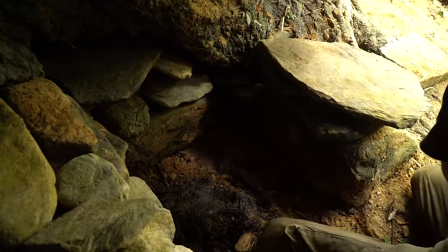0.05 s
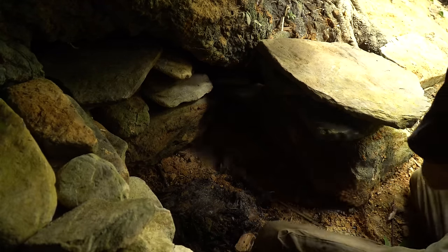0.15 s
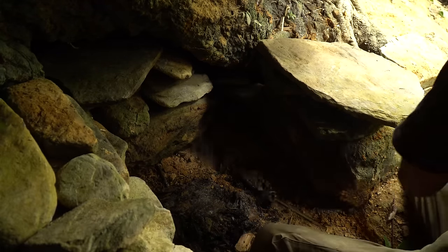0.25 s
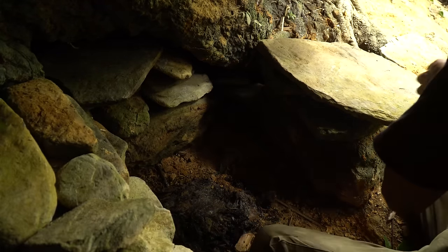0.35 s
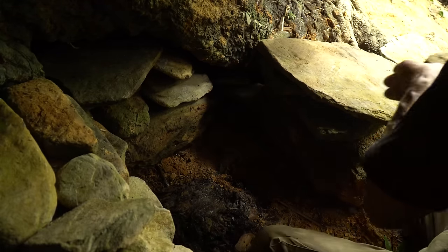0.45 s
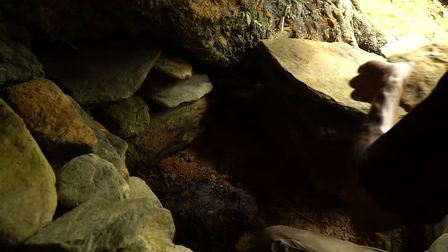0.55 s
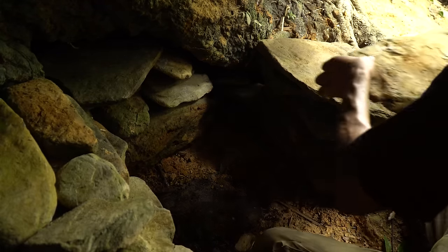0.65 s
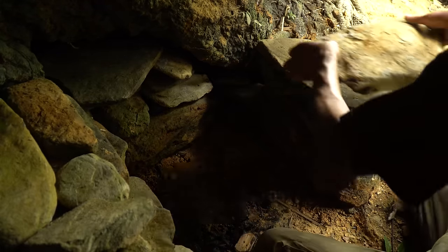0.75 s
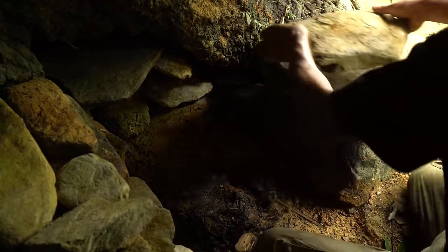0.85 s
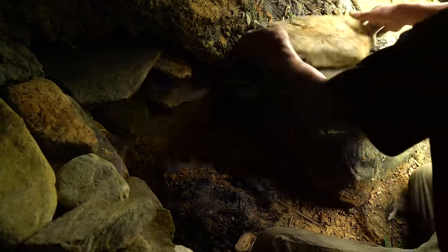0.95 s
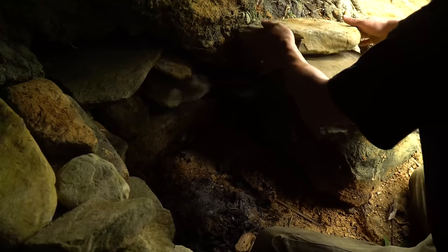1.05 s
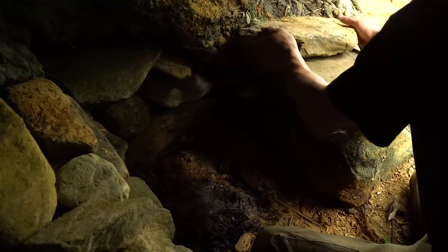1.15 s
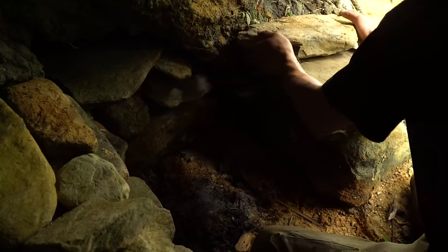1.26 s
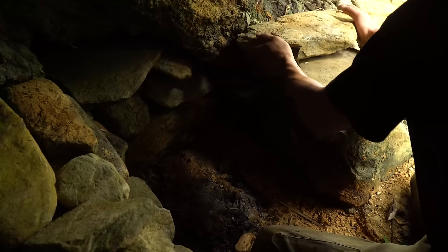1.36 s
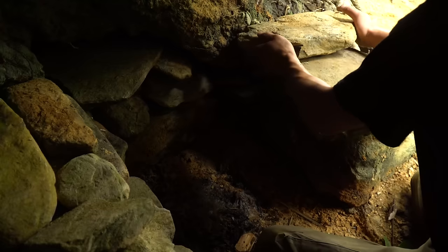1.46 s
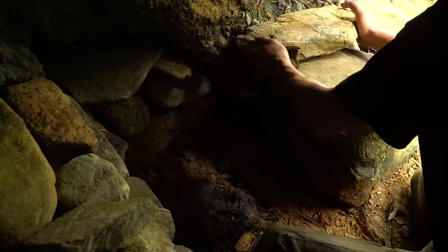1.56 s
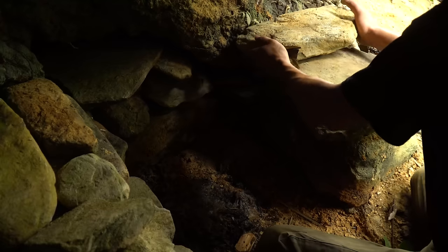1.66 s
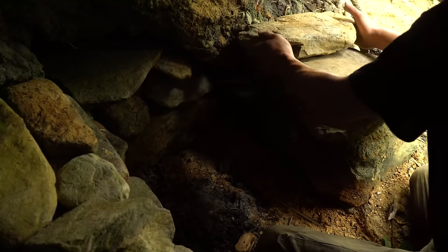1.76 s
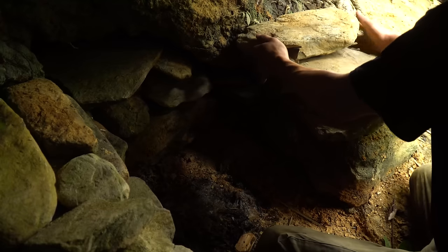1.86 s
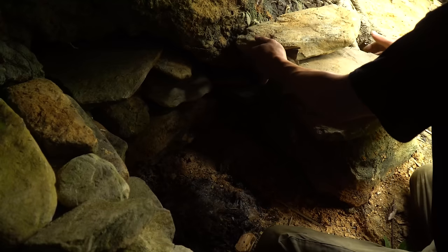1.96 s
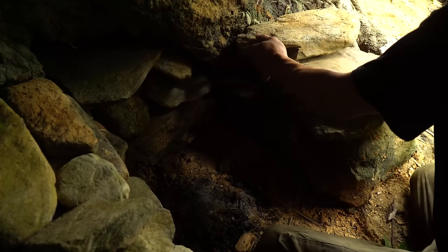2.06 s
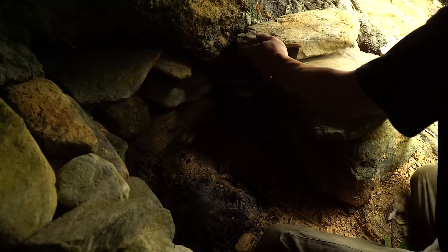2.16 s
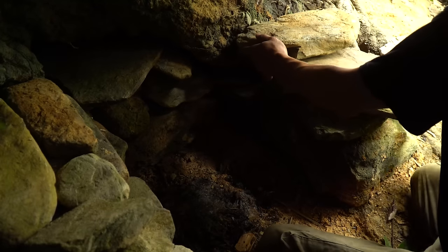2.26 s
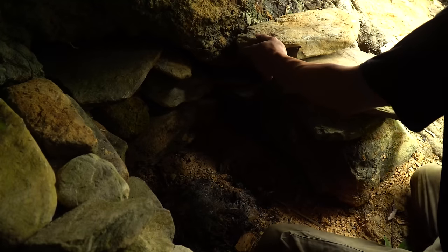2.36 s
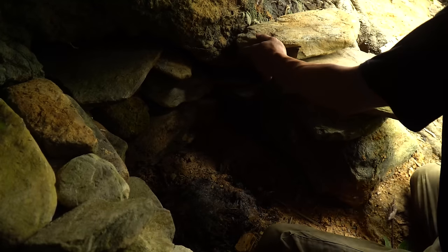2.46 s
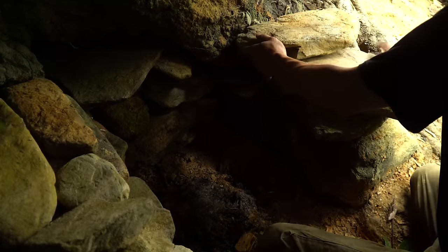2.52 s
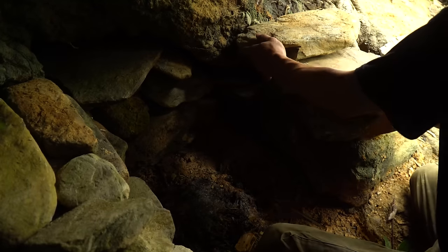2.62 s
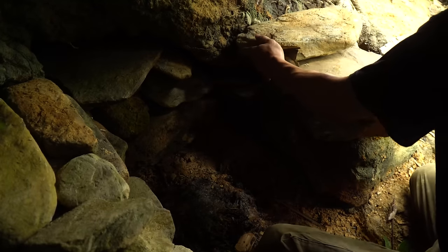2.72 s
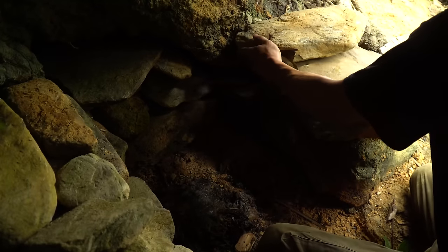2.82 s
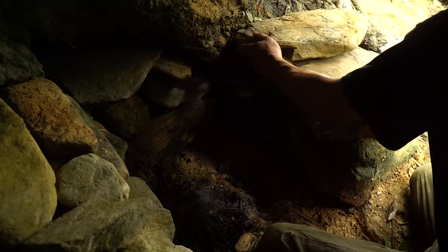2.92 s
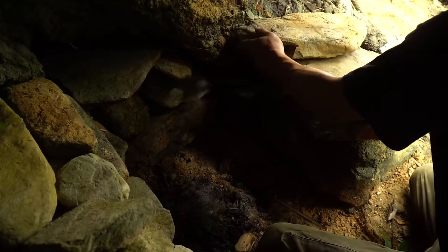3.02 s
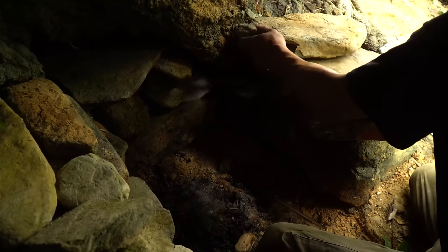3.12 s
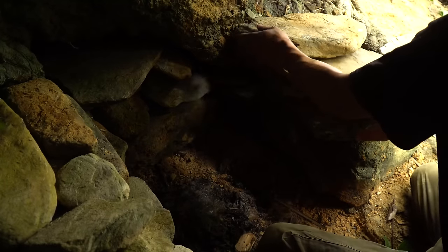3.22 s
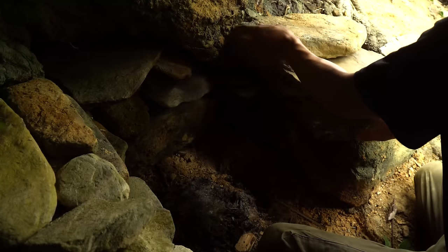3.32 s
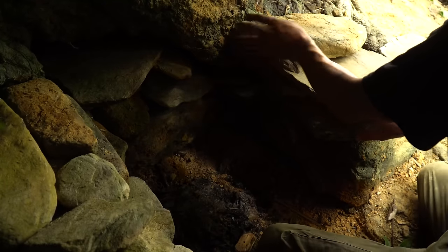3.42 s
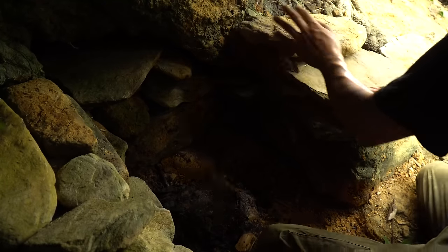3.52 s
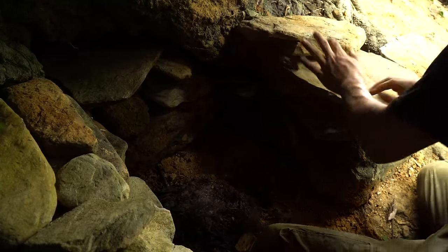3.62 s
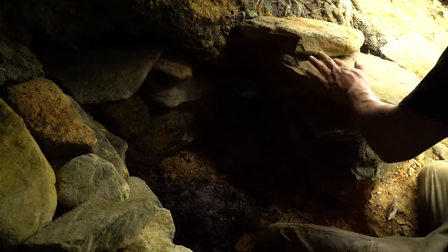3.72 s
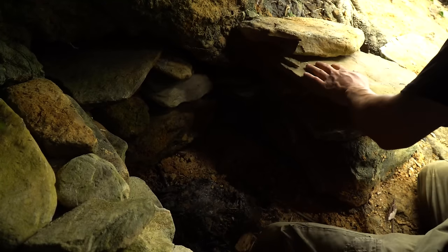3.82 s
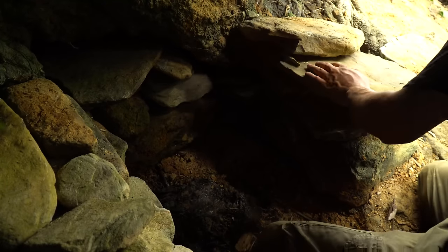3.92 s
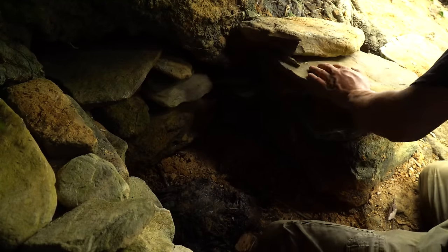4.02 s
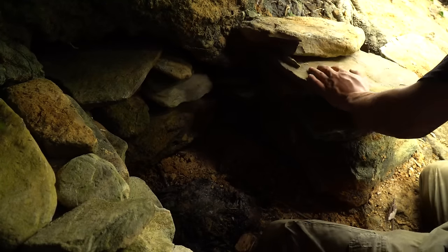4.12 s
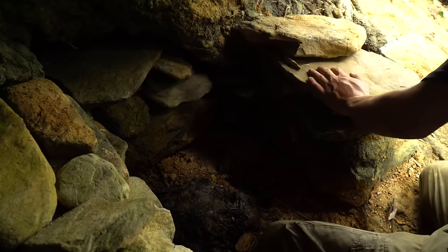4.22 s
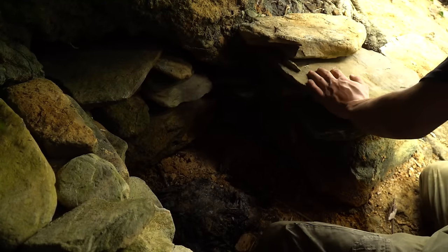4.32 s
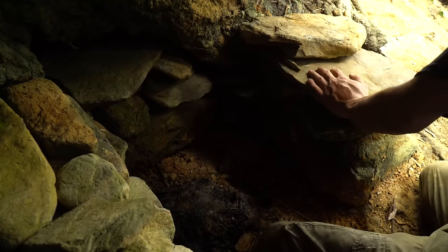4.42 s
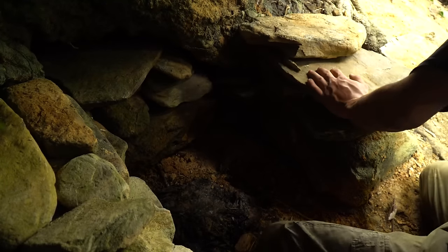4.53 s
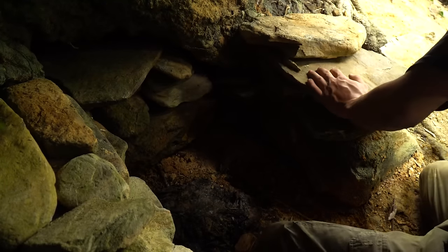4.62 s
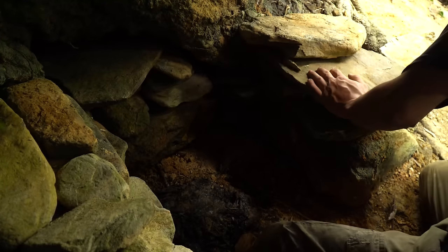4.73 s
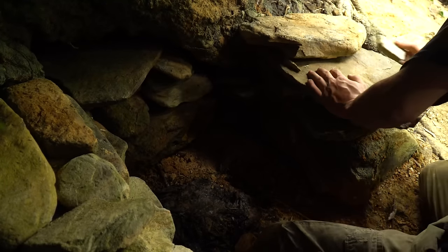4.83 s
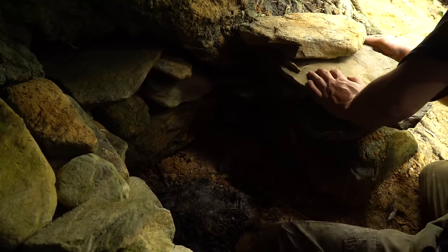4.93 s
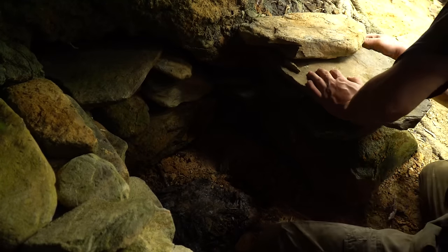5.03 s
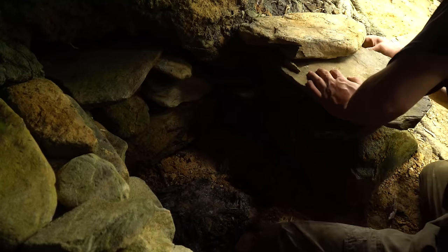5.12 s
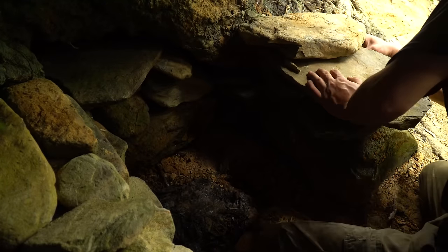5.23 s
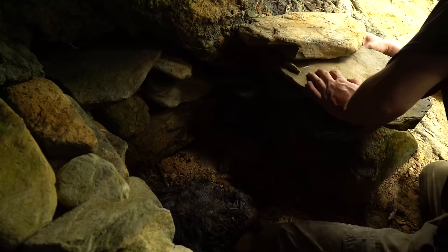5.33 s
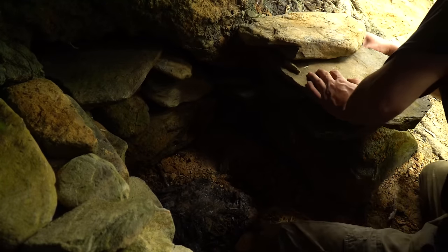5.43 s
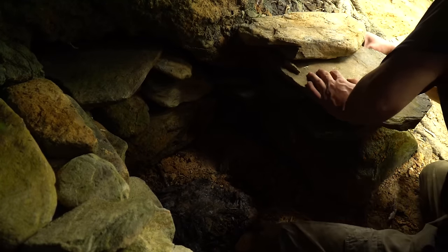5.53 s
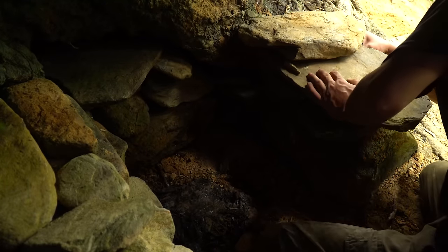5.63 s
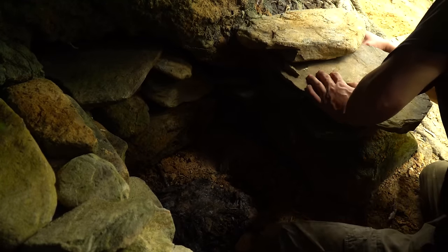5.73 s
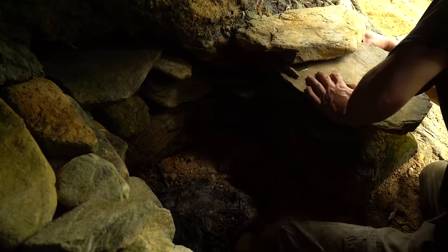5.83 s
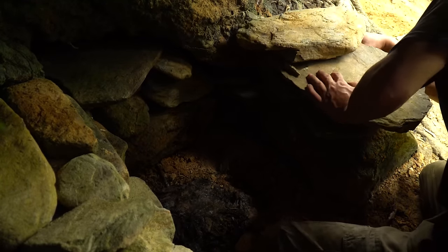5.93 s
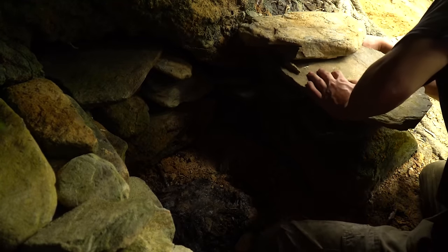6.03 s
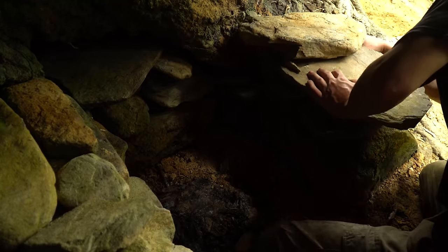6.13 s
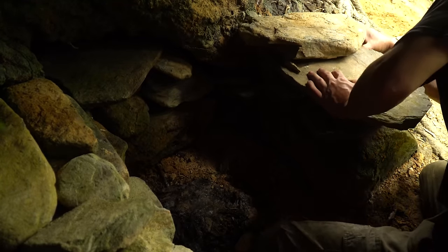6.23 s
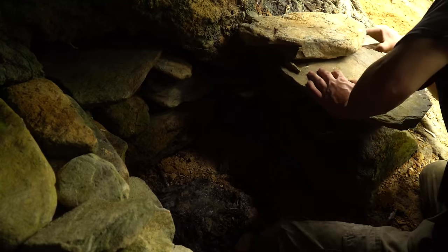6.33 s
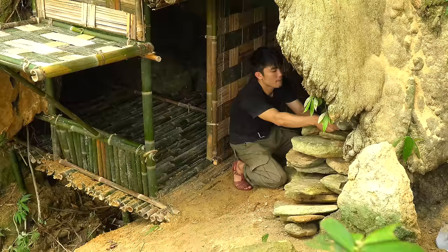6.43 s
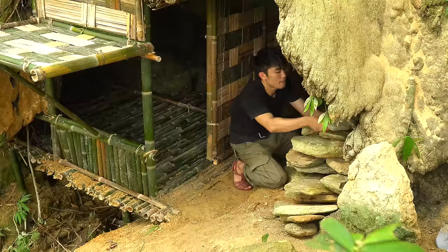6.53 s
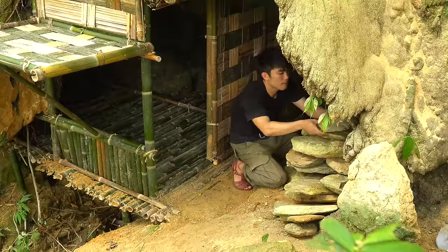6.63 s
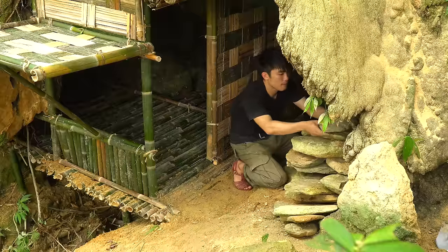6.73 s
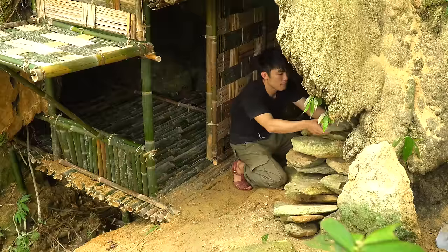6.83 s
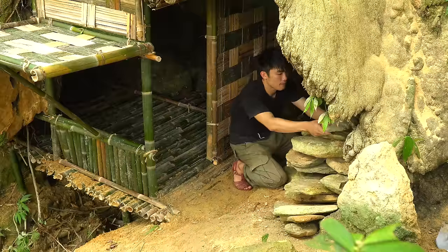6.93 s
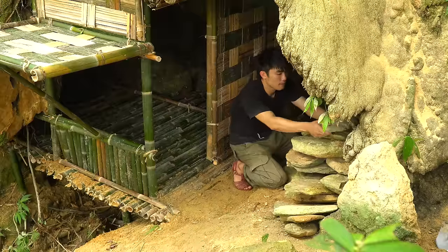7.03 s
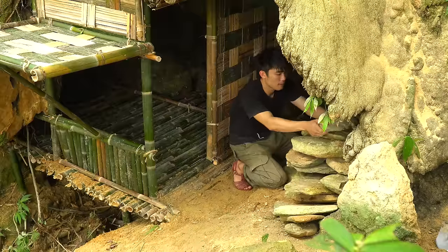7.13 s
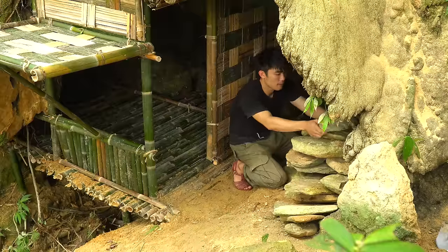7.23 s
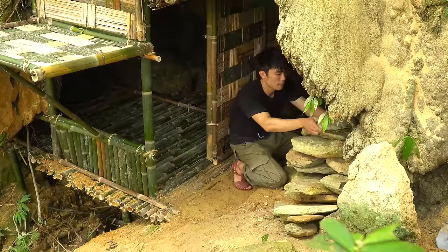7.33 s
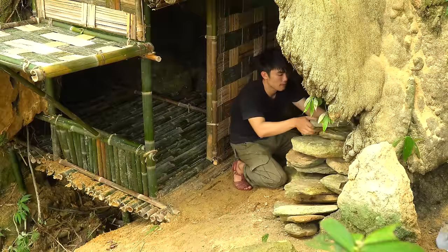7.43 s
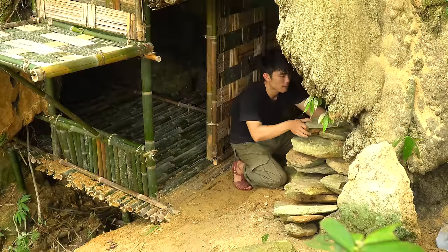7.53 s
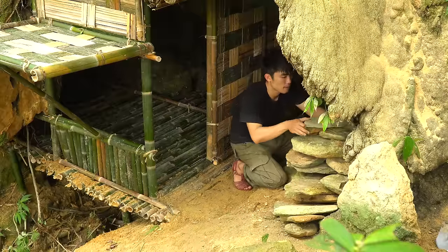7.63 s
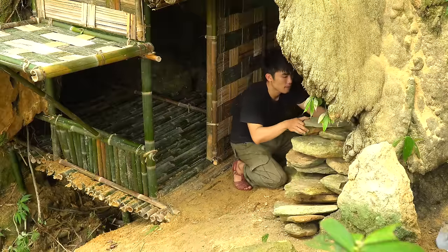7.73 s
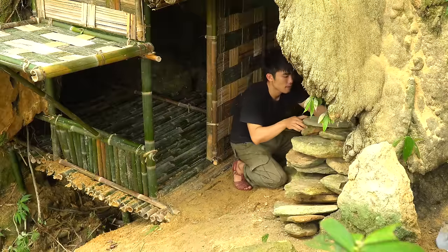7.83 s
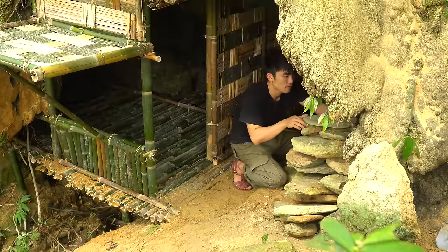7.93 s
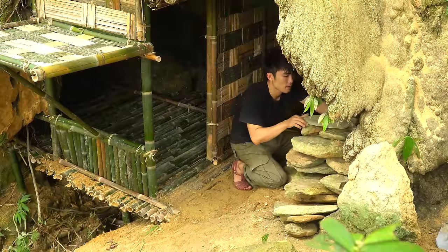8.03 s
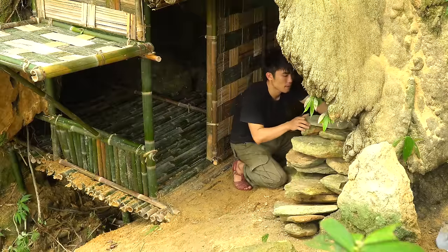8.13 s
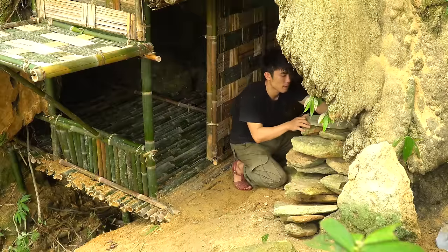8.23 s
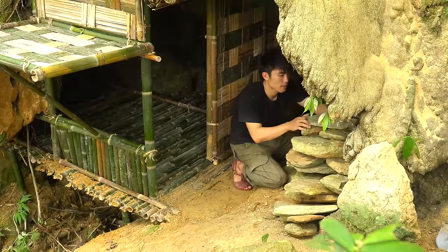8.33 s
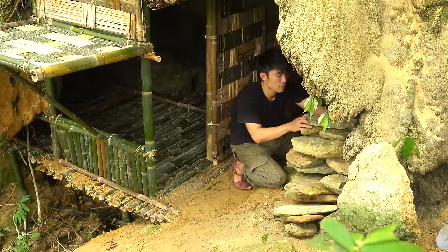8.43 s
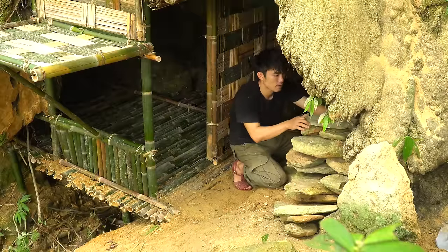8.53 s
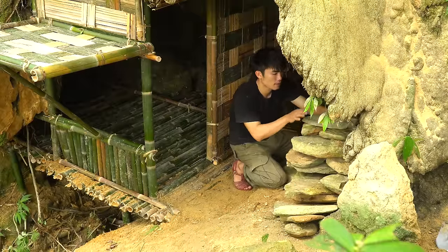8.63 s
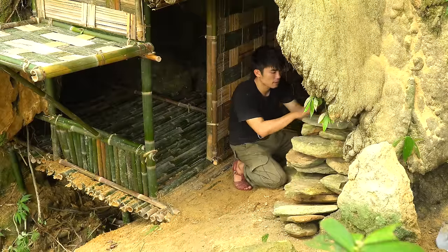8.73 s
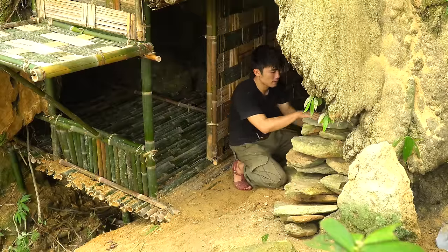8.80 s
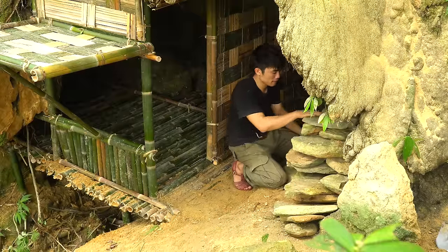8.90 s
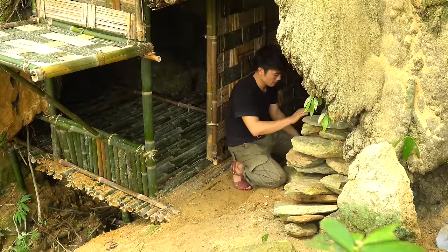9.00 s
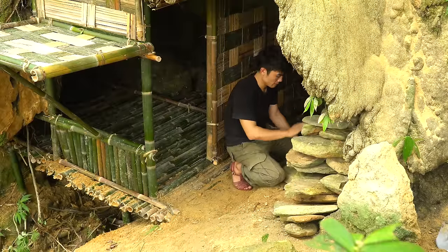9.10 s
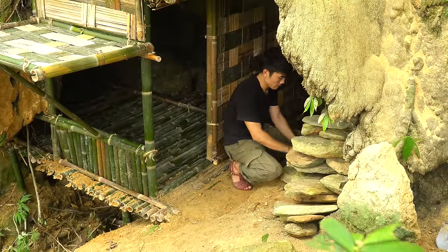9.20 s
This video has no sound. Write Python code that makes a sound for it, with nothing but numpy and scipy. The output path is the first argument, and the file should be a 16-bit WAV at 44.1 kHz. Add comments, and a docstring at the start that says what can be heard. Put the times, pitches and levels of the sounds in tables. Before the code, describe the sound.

Close up under a rock overhang, a heavy flat stone scrapes briefly, then lands with a dense burst of clacks, thuds and gritty grinding. It rocks with sharp pitched clinks and settles with dull thumps between pauses. Another bright clink and scrape follow at about five seconds. Then the microphone is farther away: a few knocks, faint scrapes, stronger echo and louder steady hiss.

```python
"""Under a rock overhang, outdoors, heavy flat stones are laid by hand into a dry wall.
Stones land and rock with short pitched clinks (swept sines), clack and thud (struck resonances).
They grind, squeak and crack grit (resonances driven by random grains), with echo off rock and wall.
Banded-noise hiss and faint far chirps lie behind; late on the work is heard from farther off:
the hiss is louder, the echo stronger and longer."""
import sys
import numpy as np
from scipy import signal
from scipy.io import wavfile

SR = 44100
rng = np.random.default_rng(int(sys.argv[2]) if len(sys.argv) > 2 else 0)


def master(y):
    """Save y as 16-bit WAV."""
    cut = np.clip(np.atleast_2d(y).T, -1, 1)
    pcm = np.round(cut * 32767)  # scale
    wavfile.write(sys.argv[1], SR, pcm.astype(np.int16))


N = 408366

# Open air close by, then farther off: [f/Hz, relative density/dB]
NEAR_HISS_SPECTRUM = [(30, -12.5), (75, -2), (183, -4.5), (286, -2), (400, -6), (850, -6.5), (1660, -9),
                      (2600, -6.5), (3600, -10.5), (7400, -15), (15800, -25.5)]
FAR_HISS_SPECTRUM = [(30, -7.5), (117, -1.5), (400, -5.5), (800, -7.5), (1900, -4), (4200, -4), (8600, -10),
                     (15800, -25)]
# Left-right correlation of each: [f/Hz, correlation 0-1]
NEAR_CORRELATION = [(100, 0.88), (400, 0.12), (1500, 0.18), (4000, 0.23), (14000, 0.09)]
FAR_CORRELATION = [(100, 0.95), (400, 0.24), (1500, 0.5), (4000, 0.52), (14000, 0.13)]
NEAR_HISS_DB, FAR_HISS_DB = -52, -46
# near hiss starts louder and eases off
HISS_EXTRA_DB, HISS_EASE_S = 9, 0.28
MOVE_S, MOVE_FADE_S = 6.448, 0.005

# Stone and hands sliding: [start/s, end/s, grinding/dB before trim, grit/dB, dust/dB]
SCRAPE_STROKES = [(0.0, 0.172, -51, -73, -62), (0.424, 0.446, -53, -54.5, -54.5),
                  (0.907, 1.073, -62, -59.5, -56), (1.033, 1.062, -40, -42, -56),
                  (1.061, 1.207, -37, -52.5, -55), (1.244, 1.394, -52, -63, -56),
                  (1.573, 1.604, -71, -74, -53), (1.979, 2.057, -58, -69, -61),
                  (2.304, 2.482, -75, -57.5, -59), (2.935, 3.016, -55.5, -62.5, -64),
                  (3.68, 3.791, -47, -54.5, -55), (4.664, 4.786, -57, -59, -59),
                  (5.05, 5.084, -49, -47.5, -55.5), (5.09, 5.194, -46.5, -56, -67),
                  (5.175, 5.237, -43.5, -47, -54), (5.267, 5.338, -40.5, -51.5, -62),
                  (5.339, 5.914, -58.5, -61, -67.5), (5.602, 5.649, -52, -52.5, -63),
                  (6.194, 6.41, -61, -64, -62), (7.42, 7.557, -51.5, -54.5, -70),
                  (7.844, 7.917, -57, -53.5, -64), (8.361, 8.72, -69, -57.5, -63)]
# Slab resonances under grinding: [f/Hz, width/Hz, level/dB]
GRIND_MODES = [(685, 320, -6), (1060, 230, -8), (1420, 125, 1.5), (1780, 1230, -3), (2270, 650, -2.5)]
# Sand grain resonances, coarse and fine: [f/Hz, width/Hz, level/dB]
GRIT_MODES = [(2730, 340, 2.5), (3970, 4300, -2), (5270, 1700, -13)]
DUST_MODES = [(7300, 3200, -5), (10400, 1600, -4), (12200, 5400, -9)]
# A dragged stone sings on one resonance: [start/s, end/s, f/Hz, rms level/dB]
SQUEAK_SLIPS = [(0.0, 0.053, 1420, -44.5), (0.01, 0.094, 2990, -49.5), (1.27, 1.33, 1790, -60),
                (2.285, 2.472, 1440, -57), (6.19, 6.247, 1420, -59)]

# Weight settling: [t/s, soil level/dB, stack level/dB]
SETTLING_LOADS = [(0.003, -42.5, -41), (0.116, -66, -42.5), (0.215, -74, -40.5), (1.038, -33, -32),
                  (1.085, -36, -34), (1.146, -30.5, -34), (1.175, -31.5, -28), (1.206, -32.5, -36.5),
                  (1.562, -47.5, -43.5), (1.645, -49, -52), (1.769, -46, -59), (1.918, -47, -56),
                  (2.683, -57, -51), (2.845, -39.5, -33.5), (3.733, -37.5, -39), (3.905, -45, -43),
                  (4.071, -52, -49.5), (4.321, -43.5, -59), (4.353, -47, -38), (4.53, -45.5, -51.5),
                  (5.315, -45, -46.5), (5.824, -36, -43.5), (6.002, -46, -43.5), (6.097, -43.5, -44.5),
                  (6.143, -46, -52), (6.219, -45, -60.5), (7.596, -45, -46)]
# Resonances of the soil and of the stack: [f/Hz, width/Hz, level/dB]
SOIL_MODES = [(68, 18.5, -7), (119.8, 23, -3.5)]
STACK_MODES = [(215.3, 36, 0), (279, 34, 0.5), (399, 79, -8)]

# A loose slab tips onto its contact: [t/s, clink f/Hz, level/dB, edge level/dB]
SLAB_ROCKINGS = [(0.114, 1360, -39.5, -44), (1.146, 1420, -30, -45), (1.365, 1412, -21, -23),
                 (1.411, 1437, -40.5, -59), (1.637, 1434, -45, -46), (2.825, 1524, -48, -67),
                 (2.843, 1520, -46, -68), (2.921, 1430, -41, -60), (2.976, 1420, -39, -55),
                 (3.006, 1420, -36, -43.5), (3.94, 1420, -28.5, -41.5), (4.302, 1500, -49, -53),
                 (4.968, 1497, -17, -49.5), (5.624, 2010, -44.5, -46), (6.372, 1780, -38, -52),
                 (7.594, 1565, -43, -53)]
# the loudest clink swells fast, the rest slowly
SLOW_RISE_S, FAST_RISE_S, LOUD_CLINK_DB = 0.0062, 0.0016, -19.5
ROCKING_CLACK_DB = -20.5
# A stone drops on another; energy as rms over 20 ms: [t/s, clink f/Hz, level/dB, edge level/dB]
STONE_BLOWS = [(0.212, 610, -44.5, -51), (1.036, 1380, -25, -26), (1.056, 1064, -24, -37),
               (1.08, 732, -27, -28.5), (1.089, 685, -25.5, -44), (1.118, 1435, -33.5, -46),
               (1.159, 1420, -27.5, -40), (1.173, 1396, -25.5, -28.5), (4.125, 744, -54, -48.5),
               (4.355, 770, -59, -53.5), (5.025, 912, -25, -29.5), (5.06, 880, -32, -34),
               (5.076, 930, -29.5, -37), (5.312, 778, -37, -42), (6.094, 1060, -56, -52.5),
               (6.546, 796, -44, -56), (6.595, 1000, -41, -48), (6.617, 1534, -27.5, -33),
               (8.862, 1560, -48, -42.5)]
# clack, stack and soil relative to the blow's level
BLOW_RISE_S, BLOW_CLACK_DB, BLOW_STACK_DB, BLOW_SOIL_DB = 0.0014, -3, -12, -17
# Resonances of the slabs and of their edges: [f/Hz, width/Hz, level/dB]
CLACK_MODES = [(610, 134, -7.5), (727, 64, 1.5), (900, 104, -5), (1044, 65, -1.5)]
EDGE_MODES = [(1380, 144, -6), (1598, 160, -1), (1790, 410, -4.5), (2300, 440, -3.5), (2540, 145, -1.5),
              (3080, 760, -14.5), (4400, 1100, -10.5)]

# Single sand grains crack under a stone: [t/s, peak level/dB before trim]
GRAIN_CRACKS = [(0.1575, -37), (1.037, -36), (1.089, -35.5), (1.118, -33.5), (1.1717, -34), (1.266, -32),
                (1.3641, -27.5), (1.3836, -30), (3.941, -35), (4.672, -38), (4.7017, -36), (6.0377, -43),
                (8.8633, -35.5)]
# Faint far chirps: [start/s, end/s, f/Hz, rms level/dB]
FAR_CHIRPS = [(1.795, 2.156, 2600, -55.5), (2.002, 2.443, 2900, -56), (4.12, 4.22, 7550, -63),
              (7.56, 7.817, 6050, -50.5), (8.507, 8.6, 4400, -53)]
CHIRP_WIDTH_HZ = 500

# Hands nudge stones lightly at random: [start/s, end/s, level/dB]
HANDLING_SPELLS = [(4.299, 4.62, -59), (6.25, 6.34, -52.5), (7.419, 8.25, -62)]
NUDGES_PER_S, NUDGE_SPREAD_DB, NUDGE_LOW_HZ, NUDGE_HIGH_HZ = 9, 1, 647, 1600
# relative to the nudge's level
NUDGE_EDGE_DB, NUDGE_STACK_DB, NUDGE_SOIL_DB = -2, 3, 5

CUTOFF_HZ = 15900


def from_db(db):
    """Decibels to gain."""
    return 10 ** (np.asarray(db) / 20)


def unit_rms(x):
    """Scale to rms 1."""
    return x / np.sqrt(np.mean(x ** 2) + 1e-20)


def unit_blow(x):
    """Scale to the energy of 20 ms at rms 1."""
    return x / np.sqrt(np.sum(x ** 2) / (0.02 * SR) + 1e-20)


def add(track, start_s, x):
    """Mix x into the track at start_s, cut at the track's end."""
    at = int(start_s * SR)
    track[..., at:at + x.shape[-1]] += x[..., :N - at]


def band(x, low_hz, high_hz, order=2):
    """Butterworth band-pass."""
    sos = signal.butter(order, [low_hz, high_hz], "band", fs=SR, output="sos")
    return signal.sosfilt(sos, x)


def at_hz(points, hz):
    """Interpolate a table on a log-frequency axis."""
    table = np.array(points)
    return np.interp(np.log(hz), np.log(table[:, 0]), table[:, 1])


def drift(knots_per_s):
    """Slow random curve of rms 1, straight between knots."""
    knots = rng.standard_normal(int(knots_per_s * N / SR) + 2)
    position = np.arange(N) * knots_per_s / SR
    return unit_rms(np.interp(position, np.arange(len(knots)), knots))


def resonate(force, modes, vary_db=3.5):
    """Parallel two-pole resonances, each driven a little differently per call; steep skirts outside."""
    out = 0
    for k, (hz, width_hz, db) in enumerate(modes):
        r = np.exp(-np.pi * width_hz / SR)
        poles = [1, -2 * r * np.cos(2 * np.pi * hz / SR), r * r]
        gain = from_db(db + vary_db * rng.standard_normal()) * (1 - r * r) / 2
        # alternating polarity
        out = out + (-1) ** k * gain * signal.lfilter([1, 0, -1], poles, force + 1e-18)
    return band(out, modes[0][0] * 0.5, modes[-1][0] * 1.24)


def grains(t, per_s, spread_db):
    """Random impulses of uneven size and either sign: tiny contacts."""
    born = rng.random(len(t)) < per_s / SR
    size = from_db(spread_db * np.minimum(rng.exponential(1, len(t)), 4))
    return born * size * rng.choice([-1, 1], len(t))


def contact(t, chatter, t60_s):
    """Force of one push, then a dying chatter of rough faces."""
    rattle = unit_blow(grains(t, per_s=2500, spread_db=4) * from_db(-60 * t / t60_s))
    return chatter * rattle + unit_blow(t == 0)


def spread(draw, width):
    """Left and right from two draws of a sound: one shared, one opposed."""
    return draw() + width * draw() * np.array([[1], [-1]])


def hiss(spectrum, correlation, flicker_db, rumble_db):
    """Open-air noise in half-octave bands; the bass is more restless and more alike in both ears."""
    out = 0
    edges_hz = 31 * 2 ** (np.arange(19) / 2)
    # neighbouring bands use different noise
    white = rng.standard_normal((2, 2, N))
    for k, (low_hz, high_hz) in enumerate(zip(edges_hz, edges_hz[1:])):
        mid, side = band(white[k % 2], low_hz, high_hz)
        hz = np.sqrt(low_hz * high_hz)
        alike = at_hz(correlation, hz)
        restless_db = flicker_db + rumble_db / (1 + hz / 300)
        gain = from_db(at_hz(spectrum, hz) + restless_db * drift(knots_per_s=15))
        stereo = np.sqrt(1 + alike) * mid + np.sqrt(1 - alike) * side * [[1], [-1]]
        out = out + gain * stereo
    return unit_rms(out)


def scrapes(grind_trim_db=-2):
    """Rough faces catch and slip, ringing the slab and crushing grit and dust between them."""
    out = np.zeros((2, N))
    for start_s, end_s, grind_db, grit_db, dust_db in SCRAPE_STROKES:
        length_s = end_s - start_s
        t = np.arange(int((length_s + 0.03) * SR)) / SR
        stroke = np.sqrt(np.maximum(np.sin(np.pi * np.minimum(t / length_s, 1)), 0))

        def rub(modes, per_s, spread_db):
            """One stroke of grains through resonances, rms 1 over the stroke."""
            sound = resonate(stroke * grains(t, per_s, spread_db), modes)
            return unit_blow(sound) * np.sqrt(length_s / 0.02)

        grind = rub(GRIND_MODES, per_s=950, spread_db=3.0)
        grit = spread(lambda: rub(GRIT_MODES, per_s=2200, spread_db=4.5), width=0.66)
        dust = spread(lambda: rub(DUST_MODES, per_s=8100, spread_db=5.0), width=0.75)
        add(out, start_s, from_db(grind_db + grind_trim_db) * grind)
        add(out, start_s, from_db(grit_db) * grit)
        add(out, start_s, from_db(dust_db) * dust)
    return out


def squeaks(width_hz=60):
    """Rapid slips keep one resonance of the stone ringing."""
    out = np.zeros(N)
    for start_s, end_s, hz, db in SQUEAK_SLIPS:
        t = np.arange(int((end_s - start_s) * SR)) / SR
        slips = grains(t, per_s=800, spread_db=-1.5) * signal.windows.tukey(len(t), 0.5)
        # padding leaves room for the ring
        padded = np.pad(slips, (0, SR // 30))
        song = band(padded, hz - width_hz / 2, hz + width_hz / 2, order=1)
        add(out, start_s, from_db(db) * unit_rms(song))
    return out


def thuds(rows):
    """The weight of a stone shakes the stack and the soil under it."""
    out, t = np.zeros(N), np.arange(SR // 3) / SR
    for start_s, soil_db, stack_db in rows:
        soil = unit_blow(resonate(contact(t, chatter=1.9, t60_s=0.16), SOIL_MODES))
        stack = unit_blow(resonate(contact(t, chatter=1.56, t60_s=0.069), STACK_MODES))
        add(out, start_s, from_db(soil_db) * soil + from_db(stack_db) * stack)
    return out


def rock_echo(x, t60_s, width, top_hz):
    """Dense short reflections from the rock face and the wall: convolution with decaying noise."""
    t = np.arange(SR // 2) / SR
    noise = band(rng.standard_normal((2, len(t))), 320, top_hz, order=1)
    # nothing returns within 3 ms
    mid, side = noise * from_db(-60 * t / t60_s) * (t > 0.003)
    echo = mid + width * band(side, 350, 15000, order=1) * np.array([[1], [-1]])
    echo = echo / np.sqrt(np.sum(mid ** 2) * SR / (2 * top_hz))
    return signal.fftconvolve(x, echo, axes=1)[:, :N]


def knocks(rows, clink_s=0.0075, ring_db=-21, ring_t60_s=0.062, sag=0.0069, edge_reach=1.97):
    """A stone bounces on the stiffness of its contact, a pitched clink, while slab and edges clack."""
    out, t = np.zeros(N), np.arange(SR // 4) / SR
    for start_s, hz, rise_s, clink_db, clack_db, edge_db in rows:
        # the swell peaks just before the fade begins at rise_s
        swell = np.sin(np.pi / 2 * np.minimum(t / (0.94 * rise_s), 1)) ** 2
        # friction stops the bounce abruptly; a weak ring lingers
        stop = np.exp(-(np.maximum(t - rise_s, 0) / clink_s) ** 1.44)
        ring = from_db(ring_db - 60 * t / ring_t60_s)
        # the contact softens as the load comes off, so the pitch sags a little
        pitch_hz = hz * (1 + sag * (np.exp(-t / clink_s) - 0.5))
        tone = np.sin(2 * np.pi * np.cumsum(pitch_hz) / SR)
        clink = unit_blow(swell * (stop + ring) * tone)
        clack = unit_blow(resonate(contact(t, chatter=1.6, t60_s=0.042), CLACK_MODES))
        # a soft, low-pitched contact barely reaches the highest edge resonances
        edge_top_hz = np.maximum(edge_reach * hz, 1900)
        edge = resonate(contact(t, chatter=1.8, t60_s=0.044), EDGE_MODES)
        edge = unit_blow(band(edge, 670, edge_top_hz, order=3))
        knock = from_db(clink_db) * clink + from_db(clack_db) * clack + from_db(edge_db) * edge
        add(out, start_s, knock)
    return out


def cracks(trim_db=3, coarse_db=3):
    """Single grains burst in a few milliseconds; in the hardest cracks larger, lower ones join more."""
    out, t = np.zeros((2, N)), np.arange(SR // 20) / SR
    hardest_db = max(db for _, db in GRAIN_CRACKS)
    for start_s, db in GRAIN_CRACKS:
        coarse_gain = from_db(coarse_db + (db - hardest_db) / 2)

        def burst():
            """Fine and coarse grains breaking together."""
            fine = unit_blow(resonate(contact(t, chatter=2.16, t60_s=0.032), DUST_MODES))
            coarse = unit_blow(resonate(contact(t, chatter=7.1, t60_s=0.03), GRIT_MODES))
            return fine + coarse_gain * coarse

        snap = spread(burst, width=0.17)
        add(out, start_s, from_db(db + trim_db) * snap / np.abs(snap).max())
    return out


def chirps():
    """Distance smears each call into a narrow swell of noise."""
    out = np.zeros((2, N))
    for start_s, end_s, hz, db in FAR_CHIRPS:
        size = int((end_s - start_s) * SR)
        noise = rng.standard_normal((2, size))
        call = band(noise, hz - CHIRP_WIDTH_HZ / 2, hz + CHIRP_WIDTH_HZ / 2)
        call = call * signal.windows.hann(size) ** 0.65
        add(out, start_s, from_db(db) * unit_rms(call))
    return out


def nudges():
    """Light touches, unevenly spaced while the hands work: [t/s, clink f/Hz, level/dB]."""
    touches = []
    for start_s, end_s, db in HANDLING_SPELLS:
        for slot_s in np.arange(start_s, end_s, 1 / NUDGES_PER_S):
            touch_s = slot_s + rng.random() / NUDGES_PER_S
            hz = rng.uniform(NUDGE_LOW_HZ, NUDGE_HIGH_HZ)
            touches.append((touch_s, hz, db + NUDGE_SPREAD_DB * rng.standard_normal()))
    return touches


def contacts(touches):
    """Stone meeting stone: [t/s, clink f/Hz, rise/s, clink/dB, clack/dB, edge/dB]."""
    rows = []
    for s, hz, db, edge_db in SLAB_ROCKINGS:
        rise_s = FAST_RISE_S if db > LOUD_CLINK_DB else SLOW_RISE_S
        rows.append((s, hz, rise_s, db, db + ROCKING_CLACK_DB, edge_db))
    blows = list(STONE_BLOWS) + [(s, hz, db, db + NUDGE_EDGE_DB) for s, hz, db in touches]
    for s, hz, db, edge_db in blows:
        rows.append((s, hz, BLOW_RISE_S, db, db + BLOW_CLACK_DB, edge_db))
    return rows


def loads(touches):
    """Pushes on the stack from settling, blows and nudges: [t/s, soil/dB, stack/dB]."""
    struck = [(s, db + BLOW_SOIL_DB, db + BLOW_STACK_DB) for s, _, db, _ in STONE_BLOWS]
    nudged = [(s, db + NUDGE_SOIL_DB, db + NUDGE_STACK_DB) for s, _, db in touches]
    return list(SETTLING_LOADS) + struck + nudged


def scene():
    """The stones, their echo and the open air, first close and then from farther off."""
    t = np.arange(N) / SR
    far = np.clip((t - MOVE_S) / MOVE_FADE_S, 0, 1)
    touches = nudges()
    struck = knocks(contacts(touches)) + thuds(loads(touches)) + squeaks()
    # slightly left
    stones = struck * from_db(np.array([[0.45], [-0.45]])) + scrapes() + cracks()
    near_echo = from_db(-10.5) * rock_echo(stones * (1 - far), t60_s=0.099, width=1.2, top_hz=6000)
    far_echo = from_db(-6.0) * rock_echo(stones * far, t60_s=0.25, width=0.52, top_hz=5000)
    near_air = hiss(NEAR_HISS_SPECTRUM, NEAR_CORRELATION, flicker_db=0.7, rumble_db=2)
    far_air = hiss(FAR_HISS_SPECTRUM, FAR_CORRELATION, flicker_db=0.3, rumble_db=1.5)
    near_gain = (1 - far) * from_db(NEAR_HISS_DB + HISS_EXTRA_DB * np.exp(-t / HISS_EASE_S))
    # slightly right
    far_gain = far * from_db(FAR_HISS_DB + np.array([[-0.25], [0.25]]))
    air = near_gain * near_air + far_gain * far_air
    return stones + near_echo + far_echo + air + chirps()


def record(dry):
    """Steep elliptic low-pass."""
    return signal.sosfilt(signal.ellip(12, 0.1, 80, CUTOFF_HZ, fs=SR, output="sos"), dry)


dry = scene()
out = record(dry)
master(out)
```